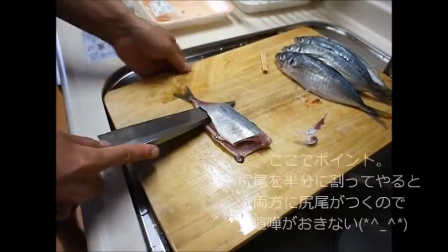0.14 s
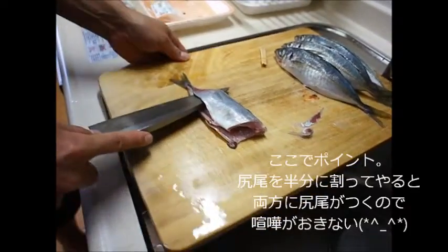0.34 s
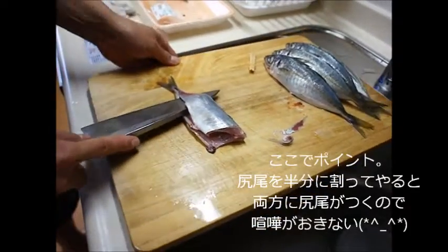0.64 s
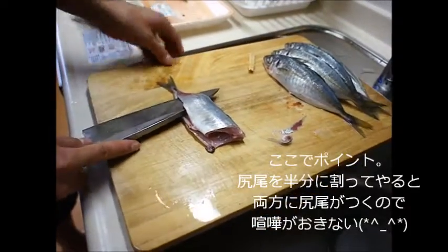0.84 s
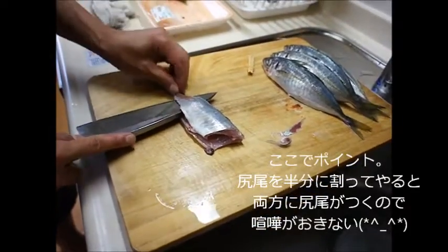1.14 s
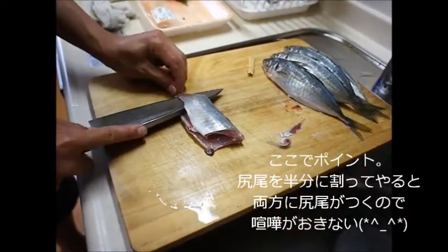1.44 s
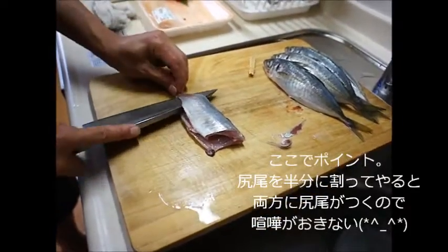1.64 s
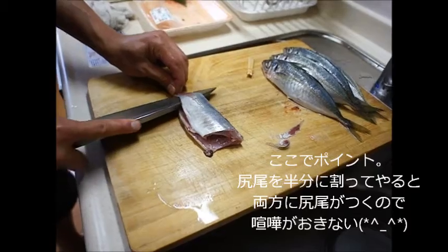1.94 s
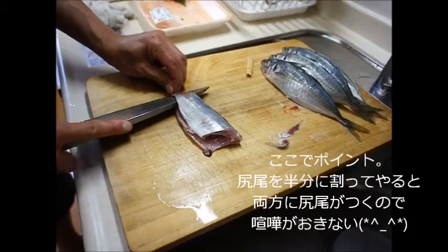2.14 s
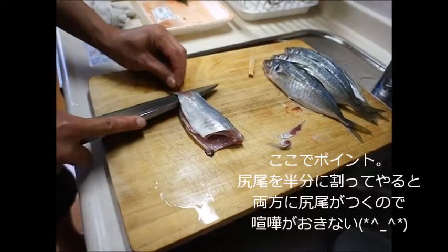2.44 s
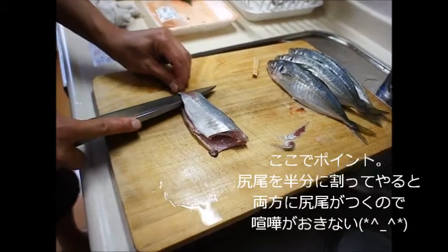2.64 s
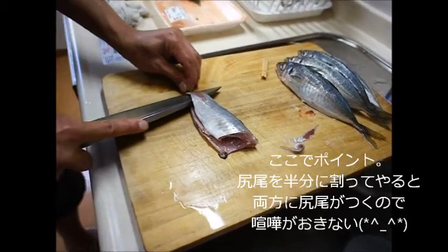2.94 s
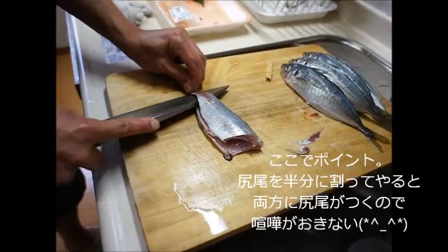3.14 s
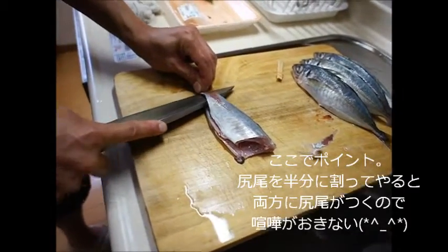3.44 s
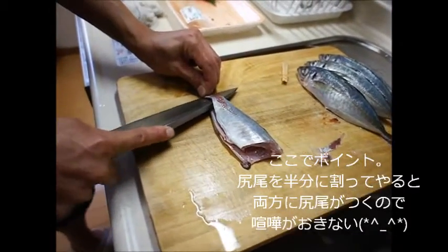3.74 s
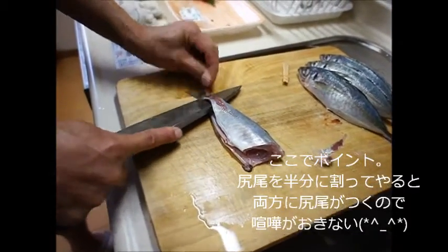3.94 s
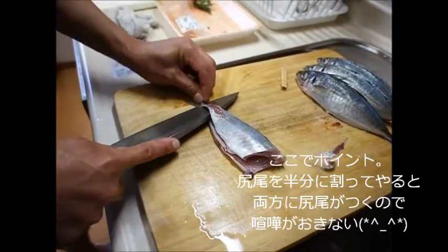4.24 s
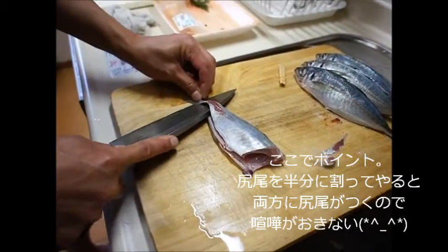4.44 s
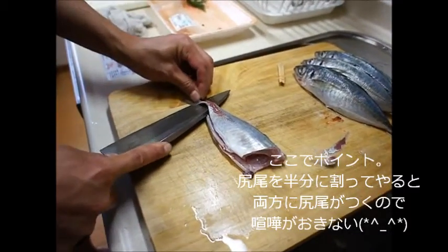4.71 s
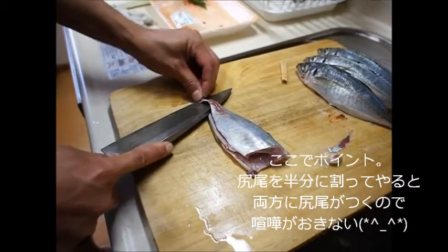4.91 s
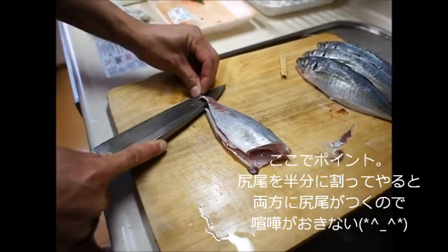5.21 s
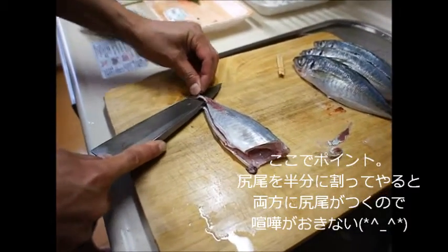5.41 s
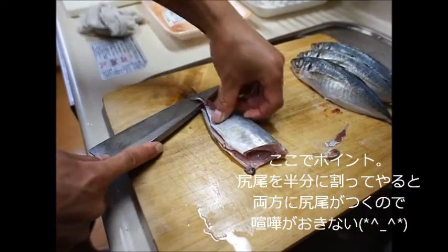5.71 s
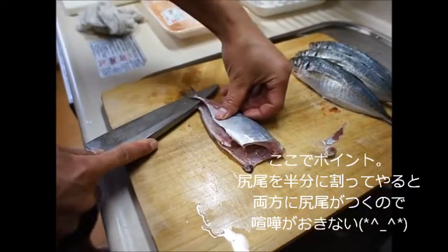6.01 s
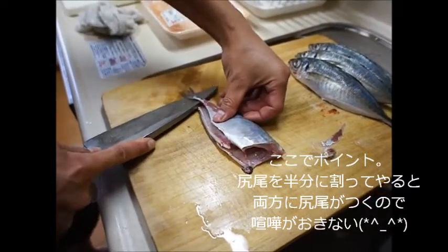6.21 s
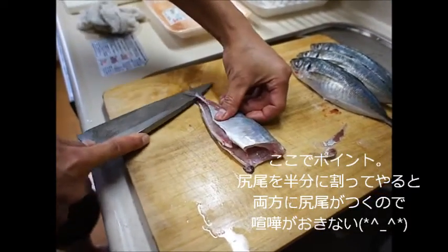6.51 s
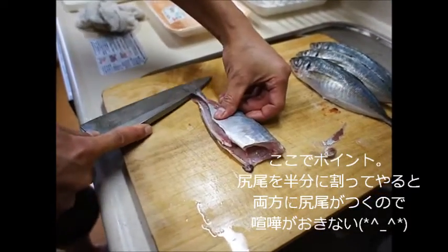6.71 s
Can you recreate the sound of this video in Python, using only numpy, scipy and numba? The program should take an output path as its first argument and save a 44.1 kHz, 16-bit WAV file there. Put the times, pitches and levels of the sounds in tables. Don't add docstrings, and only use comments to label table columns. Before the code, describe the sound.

Close by, a knife saws and knocks on a wooden board in a steel sink, one metallic bang early, camera casing creaking heavily midway.

```python
import sys
import numpy as np
from scipy import signal
from scipy.fft import rfft, irfft
from scipy.io import wavfile
from scipy.ndimage import uniform_filter1d
from numba import njit

SR = 44100
rng = np.random.default_rng(int(sys.argv[2]) if len(sys.argv) > 2 else 0)


def to_linear_factor(level_db):
    exponent = np.asarray(level_db, float) / 20
    return 10 ** exponent


def dump_mix(stems):
    frames = np.atleast_2d(stems).T
    limited = np.clip(frames, -1, 1)
    pcm = np.round(limited * 32767).astype(np.int16)
    wavfile.write(sys.argv[1], SR, pcm)


N = 302526
TIME = np.arange(N) / SR

# t/s, level/dB
MOTOR_EFFORT = [(0, 2.5), (1.0, 3.5), (1.05, -6), (2.4, -5), (2.9, -4), (3.2, 4.5), (4.2, 6), (5.5, 2.5),
                (6.2, 2.5), (6.5, 3), (6.86, 2.5)]
# t/s, peak level/dB, pull before the release/0-1.5
CASE_SLIPS = [(0.204, -10, 0.73), (0.738, -2, 1.29), (0.886, -12.5, 0.22), (2.146, -20.5, 0.2),
              (2.51, -25.5, 0), (3.114, -17, 0.8), (3.139, -15, 0.7), (3.174, -6.5, 0.72),
              (3.216, -6.5, 0.74), (4.135, -10, 1.17), (4.158, -11, 1.1), (4.242, -25, 0.5),
              (4.318, -9.5, 0.59), (4.35, -31, 0.2), (4.412, -23.5, 0.1), (4.431, -12.5, 0.74),
              (4.476, -17, 0.15), (4.514, -3, 0.76), (4.555, -21, 0.1), (4.565, -7, 0.26),
              (4.587, -21, 0.1), (4.596, -9.5, 0.39), (4.611, -19, 0.84), (4.79, -13, 0.87),
              (4.823, -18, 0.35), (4.862, -16.5, 0.5), (4.918, -21.5, 0.4), (5.623, -29, 0.7),
              (6.599, -17, 0)]


def band(x, hz, width):
    return signal.lfilter(*signal.iirpeak(hz, hz / width, fs=SR), x)


@njit
def glide(x, hz, width):
    y, band_state, low_state = np.empty(len(x)), 0., 0.
    for i in range(len(x)):
        g, damping = np.pi * hz[i] / SR, width / hz[i]
        v = (band_state + g * (x[i] + 1e-18 - low_state)) / (1 + g * (g + damping))
        band_state = 2 * v - band_state
        low_state += 2 * g * v
        y[i] = damping * v
    return y


def body(x, modes, steep=False, bend=None):
    def ring(v, one):
        total = 0
        for k, (hz, width, db) in enumerate(modes):
            first = one(v, hz, steep * width) if steep else v
            total = total + (-1) ** k * to_linear_factor(db) * one(first, hz, width)
        return total

    def bent(v, hz, width):
        return glide(v, hz * bend, float(width))

    resonator = band if bend is None or len(x) < N else bent
    return ring(x, resonator) / np.sqrt(np.sum(ring(signal.unit_impulse(SR // 2), band) ** 2))


def struck(times, peak_db, modes, chatter=0., bend=None):
    blows = np.zeros(N)
    blows[(np.asarray(times) * SR).astype(int)] = to_linear_factor(np.asarray(peak_db))
    if chatter:
        fade = np.exp(-1 / (chatter * SR))
        blows = signal.lfilter([np.sqrt(1 - fade ** 2)], [1, -fade], blows) * rng.standard_normal(N)
    push = np.hanning(int(.7 * SR / modes[-1][0]) + 3)
    steep = 2.6 * (chatter == 0 and bend is not None)

    def soft(v):
        return body(np.convolve(v, push)[:len(v)], modes, steep=steep, bend=bend)

    return soft(blows) / np.abs(soft(signal.unit_impulse(SR // 10))).max()


def walk(rate):
    hold = int(SR / rate)
    levels = np.repeat(rng.standard_normal(N // hold + 1), hold)
    return 0.92 * uniform_filter1d(levels, hold)[:N]


def coloured(hz, db):
    f = np.maximum(np.fft.rfftfreq(N, 1 / SR), 1)
    gain = to_linear_factor(np.interp(np.log(f), np.log(hz), db))
    return irfft(rfft(rng.standard_normal(N)) * gain, N) * np.sqrt(SR / 2)


def hiss():
    # f/Hz, left port level/dB per Hz, right port level/dB per Hz
    port_noise = [(50.5, -75.5, -101), (122, -81.5, -76), (290, -75.5, -79), (576, -81.5, -81.5),
                  (880, -88.5, -84.5), (1390, -92, -88), (3300, -92, -91.5), (4750, -91.5, -93),
                  (6000, -100, -95), (7360, -101.5, -95.5), (10600, -101, -98), (12900, -108, -103),
                  (13800, -128, -121)]
    hz, left_db, right_db = np.transpose(port_noise)
    left = coloured(hz, left_db - 6 * (hz < 100))
    right = coloured(hz, right_db)
    bass = signal.lfilter(*signal.butter(1, 1200, fs=SR), left)
    flutter_db = 2.5 * walk(60) + .8 * walk(3)
    effort_db = 1.95 * np.interp(TIME, *np.transpose(MOTOR_EFFORT)) + flutter_db
    left = left - bass + bass * to_linear_factor(effort_db) + 0.36 * right
    return np.array([left, right * to_linear_factor(0.48 * walk(3.5))])


def motor():
    frame_hz, first_s = 30 / 1.001, .0052
    step_db, back_s, back_db = -37, .0135, -6
    starts = np.arange(first_s, N / SR - .02, 1 / frame_hz)
    chance = rng.standard_normal((len(starts), 2))
    barrel = [(420, 300, -9), (980, 190, 0), (1350, 250, -9)]  # f/Hz, width/Hz, level/dB
    steps = struck(starts, step_db + 2 * chance[:, 0], barrel)
    steps = steps + struck(starts + back_s, step_db + back_db + 2 * chance[:, 1], barrel)
    throb = to_linear_factor(6.1 * np.cos(2 * np.pi * frame_hz * (TIME - first_s)) + 0.5 * walk(12))
    whine = to_linear_factor(-60.0) * throb * body(rng.standard_normal(N), [(3840, 720, 0.5), (4300, 570, 2.3)])
    return (steps + whine) * to_linear_factor(np.interp(TIME, *np.transpose(MOTOR_EFFORT)))


def hand():
    # t/s, rumble level/dB
    grip = [(0.0, -52), (1.0, -53.5), (1.74, -51.5), (2.79, -55.5), (3.11, -38.5), (3.36, -65), (3.7, -53),
            (3.97, -26), (4.2, -25.5), (4.24, -43.5), (4.89, -41.5), (5.31, -46.5), (5.5, -51.5),
            (6.86, -59)]
    # t/s, level/dB
    rustle = [
        (3.95, -53.5),
        (4.02, -55),
        (4.06, -46),
        (4.1, -47),
        (4.16, -35),
        (4.2, -34),
        (4.23, -62),
        (4.4, -62),
        (4.45, -73),
    ]
    load_db, load_s = -30, 0.017
    rumble = body(rng.standard_normal(N), [(62.4, 40, -0.34), (112.0, 39, -0.16)], steep=True)
    skin_modes = [(1410, 620, 6), (3300, 390, -0.5), (4340, 610, 4.5), (7350, 1800, -56)]
    skin = body(rng.standard_normal(N) * to_linear_factor(4.7 * walk(300)), skin_modes)
    load = sum(to_linear_factor(db + load_db) * np.exp(-((TIME - s) / load_s) ** 2) for s, db, _ in CASE_SLIPS)
    rumble = rumble * (to_linear_factor(np.interp(TIME, *np.transpose(grip)) + 1) + load)
    return rumble + skin * to_linear_factor(np.interp(TIME, *np.transpose(rustle)))


def knife():
    # start t/s, length/s, early board level/dB, late board level/dB, bite/dB
    nudges = [
        (0.027, 0.059, -38, -42, 10),
        (0.119, 0.031, -28.5, -35, -8),
        (0.164, 0.043, -20, -29, -27),
        (0.212, 0.062, -42, -47, -10),
        (0.412, 0.012, -30, -36.5, -7),
        (0.49, 0.055, -21, -21, 0),
        (1.15, 0.15, -47.5, -44, -8),
        (2.304, 0.08, -46, -45, -6),
    ]
    sawing = [(1.332, 0.14, -42, -28.5, 8), (1.512, 0.082, -33.5, -27, 0), (1.643, 0.099, -24.5, -27, -1.5),
              (1.791, 0.093, -22.5, -36.5, -2.5), (1.91, 0.12, -23.5, -25.5, -2.5),
              (2.047, 0.09, -28, -22, 2), (2.173, 0.099, -21.5, -22.5, -3.5), (2.562, 0.15, -31, -21, -7.5),
              (2.757, 0.089, -24, -19, 1), (2.88, 0.1, -39, -25.5, 4.5), (3.013, 0.099, -26.5, -23.5, 4.5),
              (3.163, 0.085, -24, -24, -6)]
    through_bone = [
        (3.286, 0.073, -18, -18.5, -12.5),
        (3.417, 0.078, -19.5, -28, -4.5),
        (3.521, 0.094, -21, -19, 4.5),
        (3.644, 0.069, -26.5, -30.5, 3.5),
        (3.68, 0.062, -30, -30, 7.5),
        (3.754, 0.12, -18.5, -29.5, 10.5),
    ]
    slides = [
        (4.232, 0.066, -33.5, -31, -4),
        (4.278, 0.069, -35, -41.5, 3.5),
        (4.393, 0.07, -36, -42, -0.5),
        (4.507, 0.096, -30, -39, 0),
    ]
    trims = [
        (4.945, 0.089, -26.5, -39, 5),
        (5.082, 0.077, -30, -37, 6),
        (5.212, 0.068, -26, -27.5, 2),
        (5.319, 0.047, -33, -29.5, -4),
    ]
    last_cut = [
        (6.221, 0.062, -19, -24, -1.5),
        (6.304, 0.047, -29, -35, 4.5),
        (6.335, 0.055, -45, -45, 26),
    ]
    # second mode level/dB, flex modes level/dB, grain modes level/dB, edge hiss level/dB
    bearings = [
        (-12, -27, -27.5, -40),
        (-6.5, -15, -17.5, -24.5),
        (-3, -6.5, -15, -22.5),
        (-7.5, -10, -15.5, -14),
        (-7, -4.5, -17.5, -25),
        (-1.5, -16.5, -19, -27.5),
    ]
    bite_gain = (0.14, 0.71, 0.44, 0.81)
    # t/s, peak level/dB, then against
    # it flex/dB, grain/dB, crack/dB
    knocks = [(0.131, -26, -25, -28, -28), (0.177, -16.5, -23, -40, -41), (0.412, -20, -30, -32, -34),
              (0.477, -7.5, 2.5, -15, -23), (0.481, -24, 0, -24, -28), (0.547, -18, 0, 6.5, -2),
              (1.455, -20.5, -15, -7.5, -19), (1.532, -32, -21, -23, -35), (1.663, -34, -22, -27, -35),
              (1.678, -23, -17, -11, -35), (1.798, -20, -16, -16, -19), (1.925, -16, -17, -34, -39),
              (1.954, -16.5, -29, -31, -37), (2.197, -16, -18, -29, -32), (2.474, -33.5, -30, -30, -42),
              (2.59, -28, -14, -30, -40), (2.621, -26, -16, -30, -40), (2.777, -23, -30, -28, -32),
              (3.04, -14, -16, -39, -19), (3.288, -14.5, -10, -12, -7), (3.54, -12, -22, -20, -21),
              (3.569, -13.5, -1, -31, -11), (3.656, -25, 2, -10, -30), (3.693, -29, 7, -12, -30),
              (3.721, -21, -3, -18, -35), (3.776, -7.5, -8, -10.5, -20), (3.791, -13.5, 1.5, -6, -3),
              (3.836, -24, 6, -3, -38), (4.949, -12.5, -16, -27, -31), (5.087, -16, -11, -21, -34),
              (5.221, -17.5, -4.5, -12, -34), (5.27, -19, -7, -28, -40), (5.323, -23, -6, -29, -40),
              (6.214, -3, -20, -21.5, -43), (6.235, -19, -10, -25, -45), (6.258, -22, -9, -30, -45),
              (6.311, -20, -14, -30, -45),
              (0.038, -33.5, -15, -28, -30), (0.07, -36, -20, -28, -30), (2.112, -22, -20, -30, -40),
               (2.186, -29, -6, -21, -25), (5.233, -25, 3, -10, -35), (5.248, -27, 7, -17, -35),
               (3.706, -26, 11, -10, -30), (5.13, -27, 1.5, -8, -35), (6.265, -20, -10, -22, -40),
               (6.328, -26, -9, -25, -40), (6.346, -34.5, 3, -8, -20), (6.353, -36.5, 2, -5, -22)]
    # t/s, main mode f/Hz
    pressed = [(0, 242), (.13, 195), (.18, 239), (.24, 215), (.45, 256), (1.3, 266.4), (2.3, 275.6),
               (2.9, 278.7), (3.3, 290.5), (3.9, 291), (4.9, 293), (5.4, 283), (6.2, 271), (6.45, 270)]
    # f/Hz, width/Hz, level/dB
    board_modes = [(143, 46, -13), (182.7, 41, -2.5), (222.5, 58, -4.5), (273, 50.3, 5), (308.5, 50, -2.5),
                   (401, 78, -17.5)]
    second_modes = [(557, 54, -3.5), (658, 62, -14.5)]
    flex_modes = [(779, 168, -0.5), (972, 66, 3), (1062, 126, -5.5), (1243, 270, -9.5)]
    grain_modes = [(1466, 89, 9.5), (1707, 123, 11.5), (1834, 80, 7), (1978, 87, 6), (2360, 530, 0.5),
                   (2900, 830, -1.5)]
    edge_modes = [(4430, 2000, 8), (5110, 1850, 6), (3040, 1130, 2), (7550, 4800, 4.5), (9730, 5560, 3.5)]
    lead_s = .0035

    force = np.zeros((5, N))
    speed_power = np.array([[0], [0], [.4], [.8], [1.4]])
    stages = (nudges, sawing, through_bone, slides, trims, last_cut)
    for strokes, bearing_db in zip(stages, bearings):
        for t0, length, early_db, late_db, bite_db in strokes:
            u = TIME - t0
            db = np.interp(u, [0.059 * length, 1.004 * length], [early_db, late_db])
            shape = to_linear_factor(db) * np.clip(u / 0.011, 0, 1) * np.clip((length - u) / 0.023, 0, 1)
            speed = np.sin(np.pi * np.clip(u / length, 0, 1))
            layer_db = np.r_[0, np.array(bearing_db) + bite_db * np.array(bite_gain)]
            force += shape * to_linear_factor(layer_db)[:, None] * (0.5 + speed) ** speed_power
    snag = np.clip(walk(60), -3, 1.2)
    force *= to_linear_factor(np.array([[1.8], [2.2], [2.4], [2.4], [2.2]]) * snag + 2.0 * walk(400))
    grit = rng.standard_normal((6, N))

    s, db, flex_db, grain_db, crack_db = np.transpose(knocks)
    bend = np.interp(TIME, *np.transpose(pressed)) / board_modes[3][0] * (1 + 0.016 * walk(20))
    second_bend = bend ** 0.52 * (1 + 0.023 * walk(9))
    wander = 1 + 0.024 * walk(12)
    # modes, blow time/s, blow peak/dB, chatter/s, bend
    layers = [(board_modes, s - lead_s, db - 0.5, 0.0, bend),
              (second_modes, s, db - 1.0 + 0.46 * flex_db, 0.0011, second_bend),
              (flex_modes, s, db + flex_db + 5.5, 0.0058, wander),
              (grain_modes, s, db + grain_db + 3.0, 0.0053, None)]
    wood = 0
    for (modes, times, peak_db, chatter, shift), drag in zip(layers, force * grit[:5]):
        wood = wood + body(drag, modes, steep=True, bend=shift)
        wood = wood + struck(times, peak_db, modes, chatter, shift)
    edge = body(force[4] * grit[4], edge_modes)
    edge = edge + struck(s, db + crack_db + 14.0, edge_modes, chatter=0.0035)
    round_edge = body(force[4] * grit[5], edge_modes)
    return wood, edge, round_edge


def case():
    # t/s, peak level/dB, f/Hz, decay/s
    cracks = [(0.202, -36, 401, 0.003), (0.045, -33, 587, 0.013), (0.178, -37, 530, 0.006),
              (0.733, -10.5, 470, 0.0012), (3.534, -12, 250, 0.015), (4.111, -17, 460, 0.0067),
              (4.133, -11.5, 436, 0.0028), (4.155, -26, 447, 0.0098), (4.186, -14, 1007, 0.0057),
              (4.1925, -15, 502, 0.01), (4.202, -22.5, 562, 0.016), (4.428, -23, 398, 0.0032),
              (4.511, -26, 390, 0.003), (4.553, -17, 470, 0.0076), (4.785, -27.5, 470, 0.0047),
              (4.818, -41, 407, 0.004)]
    # t/s, peak level/dB, f/Hz
    pings = [
        (0.9855, -53.5, 3840),
        (3.1373, -52, 3820),
        (3.204, -52, 3790),
    ]
    out = np.zeros(N + 4000)
    for (s, db, pull), scatter in zip(CASE_SLIPS, rng.standard_normal(len(CASE_SLIPS))):
        u = (TIME[:2000] - .005) * (0.72 + 0.83 * pull + 0.13 * scatter)
        late = np.maximum(u, 0)
        turns = 115 * late + 0.2 * (1 - np.exp(-late / 0.00065))
        snap = np.exp(-(u / 0.00078) ** 2)
        swing = np.where(u < 0, snap, np.cos(2 * np.pi * turns) * np.exp(-late / 0.0049))
        dip = pull * np.exp(-((u + .0015) / .0006) ** 2)
        i = int((s - .005) * SR)
        out[i:i + 2000] += to_linear_factor(db - 1.5) * (swing - dip)
    u = TIME[:3000]
    for s, db, hz, decay in cracks:
        i = int(s * SR)
        out[i:i + 3000] += to_linear_factor(db + 3) * np.sin(2 * np.pi * hz * u) * np.exp(-u / max(decay, .001))
    u = TIME[:int(.018 * SR)]
    for s, db, hz in pings:
        i = int(s * SR)
        out[i:i + len(u)] += to_linear_factor(db + 17.5) * np.sin(2 * np.pi * hz * u) * np.exp(-u / 0.017)
    return out[:N]


def ticks():
    # t/s, peak level/dB, centre f/Hz, left minus right/dB
    dry_ticks = [(0.181, -36, 9500, -7), (0.341, -43, 9930, -2), (0.441, -38, 10000, -8),
                 (0.477, -14, 2630, -3), (0.478, -23, 9500, -9), (0.479, -16, 650, -4),
                 (0.5485, -14, 5000, -4), (0.548, -9, 1500, -7), (1.0086, -34, 3970, 12),
                 (1.343, -35, 4100, -9), (1.384, -36, 4800, -4), (1.412, -38, 6500, -7),
                 (1.424, -34, 6000, -9), (2.788, -25, 2950, 1), (2.81, -22, 2900, 0),
                 (3.813, -20.5, 2520, -3), (4.015, -32, 3930, 7), (4.069, -34, 4340, 8),
                 (4.089, -29.5, 3300, 10), (4.111, -33, 4390, 2), (4.144, -43, 4300, 5),
                 (4.1586, -26, 4500, 1), (4.173, -25, 3070, 13), (4.1855, -25, 3000, 8),
                 (4.188, -14.5, 3970, 16), (4.1875, -25, 8540, 4), (4.188, -17, 14500, 2),
                 (4.173, -29, 14500, -2), (4.393, -33, 4850, 8), (4.6794, -43, 2550, -6),
                 (4.871, -39, 3830, 1), (5.765, -47, 10500, -6), (5.789, -43, 9500, -3),
                 (5.864, -46, 11000, -3), (5.9062, -37.5, 11000, -8), (6.212, -28, 1300, -4),
                 (6.389, -42, 3700, -10), (6.8, -40, 3870, -8)]
    out = np.zeros((2, N))
    for (s, db, hz, pan_db), noise in zip(dry_ticks, rng.standard_normal((len(dry_ticks), 400))):
        burst = noise * np.exp(-TIME[:400] / 0.0019)
        burst = band(band(burst, hz, 0.58 * hz), hz, 0.58 * hz)
        sides_db = np.array([[pan_db], [-pan_db]]) * 0.67
        i = int(s * SR)
        out[:, i:i + 400] += burst / np.abs(burst).max() * to_linear_factor(db - 1.5 + sides_db)
    return out


def shove():
    # t/s, rumble level/dB
    grind = [
        (0.479, -19),
        (.5, -23),
        (.53, -15.5),
        (.545, -24),
        (0.55, -17),
        (.58, -24.5),
        (.65, -35.5),
        (.75, -46),
        (.88, -59),
    ]
    # f/Hz, level/dB per Hz
    steel_noise = [(41, -62), (70, -47), (146, -4.5), (249, -9), (359, -6), (590, -7), (643, -3.5),
                   (797, -10), (2490, -17.5), (12000, -57.5), (15600, -86), (22000, -120)]
    # f/Hz, width/Hz, level/dB
    basin_modes = [(156, 50, 0.5), (367, 47, -2.5), (652, 40, 2), (957, 31, -5), (1360, 79, -12),
                   (1544, 140, -10), (1886, 50, -14), (2285, 18, -14), (2550, 50, -9), (2800, 19, -17),
                   (3000, 39, -16), (3600, 37, -29)]
    lands_s, rim_s = 0.4814, 0.553
    landing_db, rattling_db, damped_db, builds_db = 3.5, 0.5, -30, 26.5
    ring_db, chatter_db = -3.5, 2.5
    rumble_db = np.interp(TIME, *np.transpose(grind), left=-120, right=-120)
    between_db = damped_db + builds_db * (TIME - lands_s) / (rim_s - lands_s)
    rattle_db = np.select([TIME < lands_s, TIME > rim_s], [landing_db, rattling_db], between_db)
    hz, db = np.transpose(steel_noise)
    out = 0
    for kind, level_db in (("low", rumble_db), ("high", rumble_db + rattle_db)):
        steel = signal.sosfilt(signal.butter(2, 900, kind, fs=SR, output="sos"), coloured(hz, db))
        out = out + steel / steel.std() * to_linear_factor(level_db + 5.0 + chatter_db * walk(119.9))
    contact_db = rumble_db + rattle_db + ring_db + 6.0 + chatter_db * walk(200)
    return out + body(rng.standard_normal(N) * to_linear_factor(contact_db), basin_modes, steep=True)


def rings():
    # t/s, peak level/dB, f/Hz, decay/s
    lone_modes = [(0.505, -17, 255, .02), (0.57, -24, 1360, .012), (2.64, -22, 270, .025),
                  (2.79, -22, 285, .02), (3.075, -27, 760, .01), (3.69, -24, 1050, .015),
                  (3.715, -21, 570, .015), (3.835, -17, 960, .01), (4.951, -24, 580, .012),
                  (4.952, -27, 970, .012), (5.23, -22, 810, .015), (6.214, -27, 960, .008),
                  (6.214, -31, 1750, .008)]
    out, u = np.zeros(N), TIME[:5000]
    for s, db, hz, decay in lone_modes:
        envelope = np.exp(-u / decay) * (1 - np.exp(-u / .002))
        i = int(s * SR)
        out[i:i + 5000] += to_linear_factor(db + 3) * np.sin(2 * np.pi * hz * u) * envelope
    return out


def creak():
    # t/s, peak level/dB, pull before the release/0-1.5
    palm_slips = [(3.256, -8.0, 0.7), (3.2787, -6.5, 0.9), (3.2961, -6, 0.7), (3.3198, -6, 0.6),
                  (3.339, -16, 0.84), (3.353, -5.5, 0.9), (3.377, -3.5, 0.3), (3.4014, -6.5, 0.47),
                  (3.4212, -7.5, 0.7), (3.4418, -10, 0.9), (3.461, -6.5, 0.4), (3.4907, -8, 0.5),
                  (3.5079, -7.5, 0.84), (3.5281, -5, 0.4), (3.5463, -2.5, 0.71), (3.5666, -7, 0.33),
                  (3.592, -5, 0.83), (3.6189, -7, 0.8), (3.636, -8, 0.5), (3.6547, -6, 0.2),
                  (3.6802, -8, 0.2), (3.7122, -9.5, 0.4), (3.7544, -9.5, 0.3), (3.7811, -9, 0.7),
                  (3.7966, -16, 0.59), (3.8218, -8, 0.83), (3.8457, -10, 0.3), (3.874, -7.5, 0),
                  (3.904, -7, 0), (3.9325, -9, 0.52), (3.958, -9, 0.45), (3.9739, -6.5, 0.8),
                  (3.9885, -6.5, 0.53), (4.009, -10.5, 0.11), (4.0281, -9, 0.2), (4.0568, -9.5, 0.15),
                  (4.0726, -5.5, 0.4), (4.0898, -5.5, 0.4), (4.108, -7, 0.5), (4.1146, -3, 0.58),
                  (4.176, -8, 1), (4.2178, -7, 0.1)]
    snap_s, settle_hz, settle_s, settle_share = 0.00071, 87.4, 0.0074, 0.59
    out, u = np.zeros(N), TIME[:2000] - .006
    late = np.maximum(u, 0)
    settle = settle_share * np.sin(2 * np.pi * settle_hz * late) * np.exp(-late / settle_s)
    snap = np.exp(-(u / snap_s) ** 2) - settle
    pull_back = 0.5 * np.exp(-((u + 0.0019) / 0.00095) ** 2)
    for s, db, pull in palm_slips:
        i = int((s - .006) * SR)
        out[i:i + 2000] += to_linear_factor(db - 2.0) * (snap - pull * pull_back)
    return out


def tail(x, t60, top_hz):
    u = TIME[:SR]
    echo = rng.standard_normal(SR) * np.exp(-np.log(1000) * u / t60) * np.minimum(u / 0.01, 1)
    echo = signal.lfilter(*signal.butter(1, top_hz, fs=SR), echo)
    return signal.fftconvolve(x, echo / np.sqrt(np.sum(echo ** 2)))[:N]


def scene():
    wood, edge, round_edge = knife()
    steel = shove()
    wood = signal.sosfilt(signal.butter(2, 125, "high", fs=SR, output="sos"), wood + rings())
    board = wood + edge + steel
    wet = to_linear_factor(-10.0) * (wood + edge) + to_linear_factor(-16.5) * steel
    lag = signal.butter(1, 340, fs=SR)
    shadow = signal.lfilter(*lag, signal.lfilter(*lag, board))
    sides = to_linear_factor(-11.5) * edge + to_linear_factor(-14.5) * round_edge
    handling = case() + creak() + hand() + motor()
    left = to_linear_factor(1.5) * shadow + sides + to_linear_factor(-11.5) * tail(wet, 0.26, 3000) + handling
    right = board + tail(wet, 0.4, 16000)
    return np.array([left, right]) + ticks() + hiss()


def low_pass(x):
    return signal.sosfilt(signal.butter(12, 15430, fs=SR, output="sos"), x)


def record(dry):
    wide = dry - 0.26 * dry[::-1]
    wide = signal.sosfilt(signal.butter(3, 42, "high", fs=SR, output="sos"), wide)
    wide = signal.sosfilt(signal.butter(11, 12000, fs=SR, output="sos"), wide)
    return low_pass(np.clip(wide, -1, 1))


dry = scene()
out = record(dry)
dump_mix(out)
```